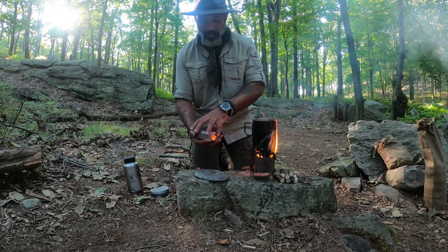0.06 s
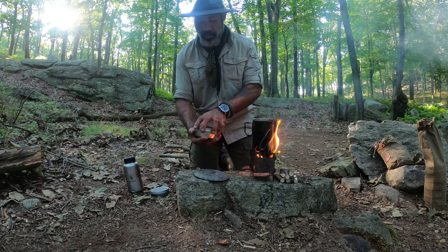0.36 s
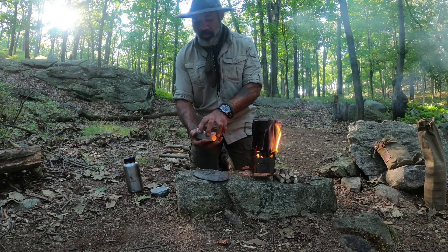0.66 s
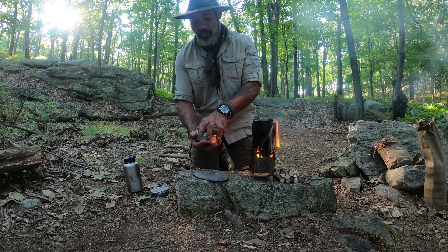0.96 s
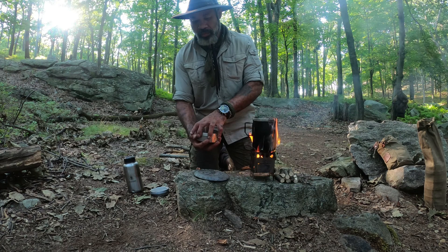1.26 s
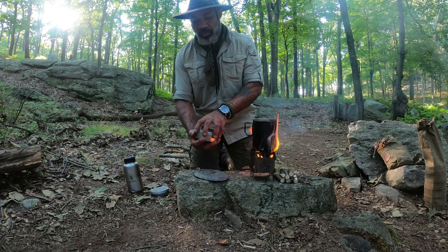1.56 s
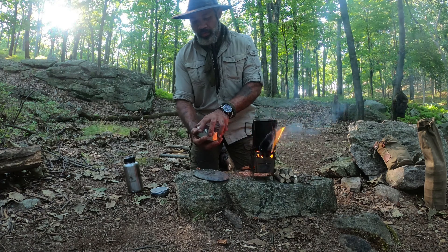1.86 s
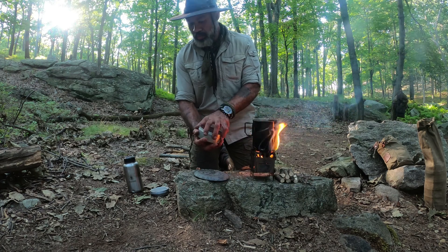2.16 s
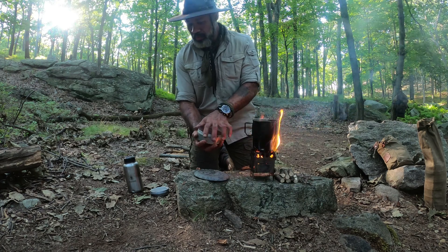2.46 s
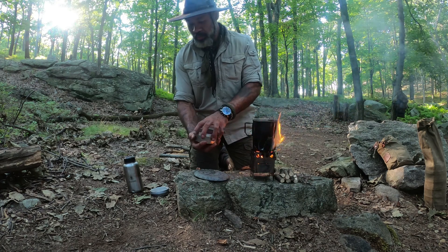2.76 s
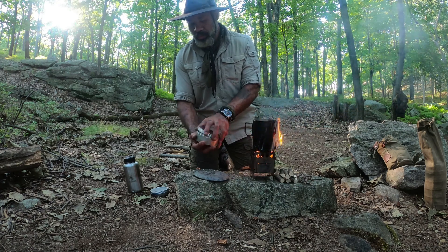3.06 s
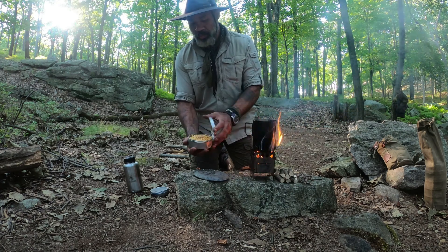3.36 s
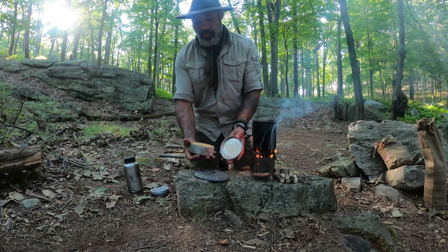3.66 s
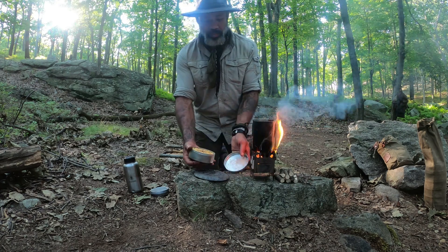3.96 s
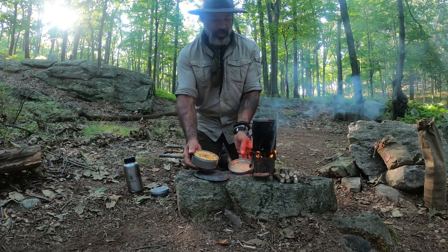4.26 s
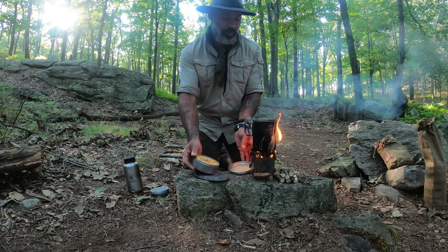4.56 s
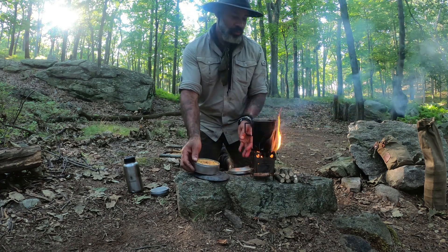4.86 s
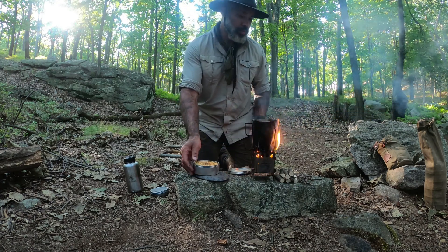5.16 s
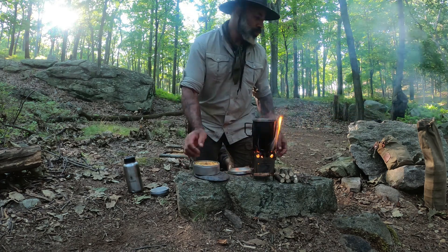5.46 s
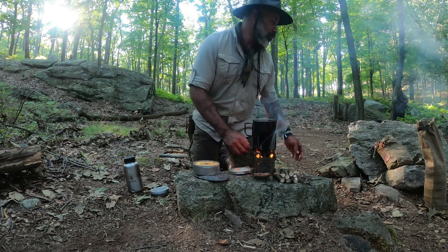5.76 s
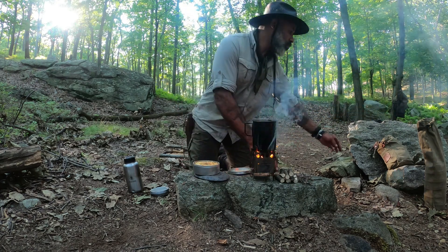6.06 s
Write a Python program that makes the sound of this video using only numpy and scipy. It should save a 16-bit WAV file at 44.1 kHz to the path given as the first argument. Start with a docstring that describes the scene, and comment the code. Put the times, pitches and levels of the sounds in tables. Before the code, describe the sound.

A metal tin is twisted open by hand, its rim scraping and clicking softly until the lid pings free. The thin lid chatters on a stone slab, the full tin lands with a dull knock, and the lid drops, ringing, rattling and rocking to rest. One more knock follows. The handling is close and near the centre, with a low fluttering wood stove, a few snapping sticks and a faint, wide drone of forest insects behind.

```python
"""Opening a tin by the stove

A camper twists the lid off a metal tin, its rim scraping and catching, then sets both on a stone slab.
The thin, empty lid rings as it chatters, drops, rattles and rocks to rest; the full tin only knocks.
Behind them a wood stove flutters low, sticks snap, and insects drone in the trees all around."""
import sys
import numpy as np
from scipy import signal
from scipy.fft import rfft, irfft, next_fast_len
from scipy.io import wavfile
from scipy.ndimage import uniform_filter1d

SR = 44100
rng = np.random.default_rng(int(sys.argv[2]) if len(sys.argv) > 2 else 0)


def pcm_store(signal):
    """Save signal as 16-bit PCM."""
    levels = np.round(np.clip(np.atleast_2d(signal), -1, 1) * 32767)
    wavfile.write(sys.argv[1], SR, levels.astype(np.int16).T)


N = 274743
TIME = np.arange(N) / SR
RING = TIME[:SR // 2]  # time axis of a one-shot


def undb(db):
    """Decibels to gain."""
    return 10 ** (np.asarray(db) / 20)


def unit(x):
    """Scale to rms 1."""
    return x / np.sqrt(np.mean(x ** 2) + 1e-30)


def add(track, s, x):
    """Mix a sound into a track at time s."""
    i = max(int(s * SR), 0)
    track[..., i:i + x.shape[-1]] += x[..., :N - i]


def colour(x, points, tilt_db=0):
    """EQ by (f/Hz, level/dB) points and a tilt per octave, rolled off at both ends; rms 1."""
    hz, db = np.transpose(points)
    f = np.maximum(np.fft.rfftfreq(x.shape[-1], 1 / SR), 1)
    gain = undb(np.interp(np.log(f), np.log(hz), db + tilt_db * np.log2(hz)))
    skirts = np.minimum(f / hz[0], 1) * np.minimum(hz[-1] / f, 1) ** 2
    return unit(irfft(rfft(x) * gain * skirts, x.shape[-1]))


def fade(t60):
    """Free decay of a struck thing."""
    return np.exp(-np.log(1000) * RING / t60)


def burst(eq, t60, tilt_db=0):
    """A hit of coloured noise: instant attack, free decay."""
    return colour(rng.standard_normal(len(RING)), eq, tilt_db) * fade(t60)


def walk(rate):
    """Smooth random modulator: levels held 1 / rate s and slewed twice; rms 1."""
    hold = int(SR / rate)
    steps = np.repeat(rng.standard_normal(N // hold + 1), hold)
    return unit(uniform_filter1d(uniform_filter1d(steps, hold), hold)[:N])


def radiated(x, edge_hz):
    """Low cut: small metal parts push little air below their lowest modes."""
    return signal.sosfilt(signal.butter(4, edge_hz, "high", fs=SR, output="sos"), x)


def strokes(table, eq, grain_db, jerk_db=2):
    """Rubbing: a dense, jerky run of tiny slips that swells quickly and eases off."""
    out = np.zeros(N)
    slips = rng.standard_normal(N) * undb(grain_db * walk(1200) + jerk_db * walk(110))
    for s, length, level_db, tilt_db in table:
        run = np.roll(slips, -int(s * SR))[:len(RING)]
        push = np.sin(np.pi * np.minimum(RING / length, 1) ** 0.49)
        add(out, s, undb(level_db) * push * colour(run, eq, tilt_db))
    return out


def cicada(level_db=-71.5, click_hz=78.5, top_hz=6050, fall_hz=900):
    """A cicada's ribs buckle in a fast rhythm; each chirp falls in pitch, blurred by the foliage."""
    phase = np.cumsum(click_hz * (1 + 0.017 * walk(4))) / SR % 1
    chirps = np.exp(2j * np.pi * np.cumsum(top_hz - fall_hz * phase) / SR) * np.sin(np.pi * phase)
    blur = np.array([walk(300) + 1j * walk(300) for ear in range(2)])
    return undb(level_db) * unit(np.real(chirps * blur))


# EQ of the woodland hush and of the two insect bands: f/Hz, level/dB
HUSH_EQ = [(20, 0), (100, 10.5), (400, 7), (700, -0.5), (1400, 2), (2500, -6), (4000, -2.5), (6700, -13.5),
           (9000, -10.5), (12000, -20), (15000, -19.5)]
LOW_CHORUS_EQ = [(3800, -35.5), (4300, -13.5), (4700, -3.5), (5000, -3.5), (5300, -11.5), (6000, -31.5)]
HIGH_CHORUS_EQ = [(4700, -35), (5350, -6.5), (5950, -4.5), (6400, -20.5), (7000, -16), (7500, -11),
                  (7700, -5.5), (7900, -12.5), (8200, -15), (8800, -33.5)]
def forest(hush_db=-69.5, low_db=-67, high_db=-68.5, swell_db=1.94, flicker_db=1.14):
    """A wide bed: hush, one cicada and two insect choruses, the lower swelling and flickering."""
    low = colour(rng.standard_normal((2, N)), LOW_CHORUS_EQ)
    low *= undb(low_db + swell_db * walk(2) + flicker_db * walk(28))
    high = undb(high_db) * colour(rng.standard_normal((2, N)), HIGH_CHORUS_EQ)
    return low + high + cicada() + undb(hush_db) * colour(rng.standard_normal((2, N)), HUSH_EQ)


# fader ride of the flames building and dying down: t/s, level/dB
BLAZE = [(0, -57.5), (1.7, -51.5), (2.2, -48), (3.5, -46.5), (4.3, -53.5), (5.4, -61), (6.23, -54)]
# EQ of the flames' roar and of the draught's rumble: f/Hz, level/dB
FLAME_EQ = [(50, -16), (100, -3), (140, 2.5), (170, 3), (230, -6), (310, -18), (420, -28), (600, -49),
            (1200, -50.5)]
DRAUGHT_EQ = [(20, -28.5), (40, -9.5), (68, 5.5), (110, 4), (200, -21)]
def stove(flutter_db=2, flame_side_db=-17, draught_db=-58, draught_side_db=-11, surge_db=2, follow=0.37):
    """The stove draws with a surging rumble and its flames flutter above it, both nearly mono."""
    apart = np.array([[1], [-1]])
    blaze_db = np.interp(TIME, *np.transpose(BLAZE))
    mid, side = colour(rng.standard_normal((2, N)), FLAME_EQ)
    roar = (mid + undb(flame_side_db) * apart * side) * undb(blaze_db + flutter_db * walk(18))
    mid, side = colour(rng.standard_normal((2, N)), DRAUGHT_EQ)
    rumble_db = draught_db + follow * (blaze_db - blaze_db.mean()) + surge_db * walk(7.3)
    return roar + undb(rumble_db) * (mid + undb(draught_side_db) * apart * side)


# EQ of the rustles and dry clicks: f/Hz, level/dB
CRISP_EQ = [(200, -4.5), (700, -7), (1400, 2.5), (3300, 2), (6000, -8), (9000, -16.5), (15000, -37.5)]
# the camper's movements: t/s, length/s, level/dB, tilt/(dB/octave)
RUSTLES = [(5.97, 0.12, -58.5, 3.5), (6.1, 0.07, -55, 4)]
def rustles():
    """Dry leaves and cloth rub as the camper shifts."""
    return strokes(RUSTLES, CRISP_EQ, grain_db=2)


# short dry clicks: t/s, level/dB, tilt/(dB/octave)
DRY_CLICKS = [(.525, -52.5, 5.5), (.689, -42.5, 8), (1.01, -56, 6.5), (1.268, -52, 6), (3.565, -54.5, 7),
              (4.3198, -42.5, 3.5), (5.116, -42.5, 3), (6.137, -45.5, 1)]
def dry_clicks(t60=0.02):
    """Short dry clicks: sticks snapping, and at 5.116 s the lid's last tick on the stone."""
    out = np.zeros(N)
    for s, level_db, tilt_db in DRY_CLICKS:
        add(out, s, undb(level_db) * burst(CRISP_EQ, t60, tilt_db))
    return out


# EQ of the closed tin rubbed in the hands: f/Hz, level/dB
RUB_EQ = [(200, 1.5), (500, -4.5), (850, -13.5), (1200, 0.5), (1400, 2.5), (1730, -1), (2050, -11.5),
          (2480, -0.5), (3300, -4), (4200, -5.5), (6000, -10.5), (9000, -15), (11500, -25.5), (15000, -34)]
# turns of the lid: t/s, length/s, push level/dB
TWISTS = [(0.199, 0.27, -56.5), (1.397, 0.087, -50.5), (1.58, 0.23, -64.5), (1.8, 0.16, -66),
          (1.96, 0.22, -61), (2.14, 0.34, -67), (2.807, .3, -55.5), (3.117, 0.061, -49)]
# clicks of the thread catching: t/s, level/dB
CATCHES = [(.1, -42), (.69, -53), (0.833, -60), (1.135, -65), (1.266, -62.5), (1.467, -49.5), (2.529, -65),
           (2.659, -51), (3.027, -55.5)]
# pings as the lid loosens and comes free: t/s, f/Hz, level/dB, t60/s
PINGS = [(.162, 2460, -51, .06), (3.135, 3020, -45, .11), (3.122, 4230, -53, .15)]
def twisting(rub_db=1, ring_db=-4, held_damping=5, neutral_push_db=-57.5, brighten=0.33):
    """The rim scrapes and catches round the tin and wakes the hand-damped lid, which pings free."""
    # a firmer push is brighter
    pushes = [(s, length, db, brighten * (db - neutral_push_db)) for s, length, db in TWISTS]
    rub = strokes(pushes, RUB_EQ, grain_db=2, jerk_db=2.15)
    for s, db in CATCHES:
        add(rub, s, undb(db) * burst(RUB_EQ, t60=0.12, tilt_db=-3))
    held_lid = sum(undb(db / 2) * np.sin(2 * np.pi * hz * RING) * fade(t60 / held_damping)
                   for hz, db, t60 in LID_MODES)
    ring = np.std(rub) * unit(signal.fftconvolve(rub, held_lid)[:N])
    out = undb(rub_db) * rub + undb(ring_db) * ring
    for s, hz, db, t60 in PINGS:
        add(out, s, undb(db) * np.sin(2 * np.pi * hz * RING) * fade(t60))
    return out


# modes of the full tin, choked by its contents and the hand: f/Hz, level/dB, t60/s
TIN_MODES = [(1210, -5, 0.021), (1472, -0.5, 0.019), (1695, -10, 0.02), (2125, 2.5, 0.015),
             (2900, -11, 0.019), (3220, -10.5, 0.023), (4300, -27, 0.018)]
# hollow tones of the tin cupped in the hands: f/Hz, level/dB
HOLLOW = [(205, 5.5), (290, 2), (410, -2.5)]
# knocks in the hands, then on the slab: t/s, level/dB, relative thump/dB
TIN_KNOCKS = [(.0945, -31.5, -4), (.110, -41, -1), (.161, -55, 2.5), (4.5098, -23, -29.5),
              (4.5112, -14.5, -40), (5.1631, -23, -38)]
def tin(scuff_s=4.488, scuff_length_s=0.091, scuff_db=-53.5, scuff_tilt_db=-1.5,
        contact_s=0.0043, thump_t60=0.032, grit_db=-17):
    """Dead, gritty knocks: the tin thumps hollowly in the hands and scuffs the stone as it lands."""
    out = strokes([(scuff_s, scuff_length_s, scuff_db, scuff_tilt_db)], RUB_EQ, grain_db=5)
    body = sum(undb(db) * np.sin(2 * np.pi * hz * RING) * fade(t60) for hz, db, t60 in TIN_MODES)
    body *= (1 - fade(contact_s)) ** 2
    thump = sum(undb(db) * np.sin(2 * np.pi * hz * RING) for hz, db in HOLLOW) * fade(thump_t60)
    for s, level_db, thump_db in TIN_KNOCKS:
        knock = radiated(body + undb(grit_db) * burst(RUB_EQ, t60=0.012), edge_hz=950)
        add(out, s, undb(level_db) * (knock - undb(thump_db) * thump))
    return out


def bounces(s, gap_s, shrink, count=3):
    """Numbered times of a run of contacts, each gap a fixed share of the one before."""
    return enumerate(s + gap_s * (1 - shrink ** np.arange(count)) / (1 - shrink))


def contact(s, level_db, tilt_db, face_db, damping):
    """One hit of lid on stone: tilt_db per octave brightens, face_db drums the face, damping chokes."""
    return s, level_db, tilt_db, face_db, damping


# the lid's hits on the stone, the last being the drop:
# t/s, level/dB, tilt/(dB/octave), damping factor, first rebound gap/s, loss per rebound/dB
LID_HITS = [(4.0951, -28, -1, 1.96, .0424, 3.5), (4.572, -43, -5.5, 0.95, .021, 3),
            (4.683, -28, -1, 1.0, .081, 10.5), (4.7844, -17.5, 4.5, 1.8, 0.045, 7)]
def chatter(first_face_db=-9, face_db_per_s=24.5, dulling_db=1):
    """Each hit rebounds softer and duller; the face drums more as the lid is lowered from its rim."""
    for s, level_db, tilt_db, damping, gap_s, loss_db in LID_HITS:
        face_db = first_face_db + face_db_per_s * (s - LID_HITS[0][0])
        for k, at in bounces(s, gap_s, shrink=.93):
            yield contact(at, level_db - k * loss_db, tilt_db - k * dulling_db, face_db, damping)


def rattle(drop_s, gap_s=.0105, jitter=.12, level_db=-24.5, fall_db_per_s=108.5):
    """Let go, the lid rattles on its rim in a fast, slightly uneven, fading roll."""
    for k, chance in enumerate(rng.standard_normal(8)):
        after = gap_s * (k + 1 + jitter * chance)
        yield contact(drop_s + after, level_db - fall_db_per_s * after,
                      tilt_db=1, face_db=1.5, damping=0.99)


def rocking(drop_s, gap_s=.1721, shrink=.582, rim_lag_s=.015):
    """The lid rocks to rest ever faster: the face slaps down and the rim ticks just after."""
    for k, at in bounces(drop_s + gap_s, gap_s * shrink, shrink):
        yield contact(at, level_db=-31.5 - 7.5 * k, tilt_db=3.5, face_db=17, damping=4.2)
        yield contact(at + rim_lag_s, level_db=-35.5 - 9 * k, tilt_db=3.5, face_db=14, damping=1.5)


# EQ of the lid's wash of weak, close overtones: f/Hz, level/dB
WASH_EQ = [(300, -20), (420, -16.5), (600, -41), (830, -30.5), (1100, -12), (1600, -2.5), (2200, 1.5),
           (2750, -4), (3600, 3), (3950, -15.5), (4400, 2), (6300, -17), (10000, -22), (11500, -30),
           (15000, -42)]
def overtones(level_db=-9, t60=.22, spread_db=5, count=70):
    """Shimmer from the thin sheet's many weak modes, as rows of f/Hz, level/dB, t60/s."""
    hz = rng.uniform(1500, 14500, count)
    db = np.interp(hz, *np.transpose(WASH_EQ)) + spread_db * rng.standard_normal(count)
    gain = unit(undb(db)) * np.sqrt(2 / count)
    return np.transpose([hz, level_db + 20 * np.log10(gain), np.full(count, t60)])


# modes of the lid ringing freely: f/Hz, level/dB, t60/s
LID_MODES = [(412, -19, .16), (1161, -6, .26), (1388, -7, .3), (1790, -17, .15), (2095, -5, .22),
             (2125, 3, .04), (2148, -7, .18), (2218, -5, .22), (2340, -11, .38), (2459, -2, .36),
             (2496, -8.5, .28), (2544, -5, .25), (2893, -14, .38), (2931, -13, .38), (3215, -10, .2),
             (3580, -12, .2), (3646, -5, .2), (3733, -7, .42), (4210, -11, .3), (4290, -13, .15),
             (4542, -10.5, .45), (4885, -13, .18), (4926, -12, .18), (5770, -15.5, .33), (6481, -23, .35),
             (6783, -25, .25), (7905, -21, .3), (8635, -26, .2), (9150, -17, .14), (10400, -21, .08)]
def lid(ring_db=-4.5, wash_db=-10, wash_t60=.2, tick_db=-1, tick_t60=0.01, rim_tick_share=0.0992,
        face_hz=2135, face_width_hz=120, hoop_share=.7,
        grind_s=0.28, grind_db=-42.5, grind_tilt_db=5, rest_s=5.115, rest_t60=.14):
    """Every hit rings the same modes: a flat one drums the face, a rim hit ticks and flexes the hoop."""
    hz, db, t60 = np.vstack([LID_MODES, overtones()]).T
    modes = np.exp(2j * np.pi * hz[:, None] * RING) * fade(t60[:, None])
    face = np.exp(-((hz - face_hz) / face_width_hz) ** 2) - hoop_share * (hz == hz.min())
    attack = (1 - fade(0.0063)) ** 2  # bending waves need a moment to spread over the sheet
    drop_s = LID_HITS[-1][0]
    # the dropped lid grinds over the grit
    out = strokes([(drop_s, grind_s, grind_db, grind_tilt_db)], WASH_EQ, grain_db=3)
    for s, level_db, tilt_db, face_db, damping in [*chatter(), *rattle(drop_s), *rocking(drop_s)]:
        gain = undb(db + tilt_db * np.log2(hz / face_hz) + face_db * face)
        phase = np.exp(2j * np.pi * rng.random(len(hz)))  # set by the point of contact
        choke = fade(0.41) ** (damping - 1)  # fingers and stone damp the ring
        ring = undb(ring_db) * np.imag((gain * phase) @ modes) * attack * choke
        # grit under the rim adds a tick and a noisy wash
        grit = colour(rng.standard_normal(len(RING)), WASH_EQ, tilt_db) * (1 - fade(0.0011))
        tick = undb(tick_db - rim_tick_share * face_db) * fade(tick_t60)
        wash = undb(wash_db) * fade(wash_t60 / damping)
        add(out, s, undb(level_db) * (ring + grit * (wash + tick)))
    mute = undb(-60 * np.maximum(TIME - rest_s, 0) / rest_t60)  # the stone stills the lid lying flat
    return radiated(out, edge_hz=330) * mute


def place(x, lag, pan_db, most_rad=6.8):
    """Close-pair stereo: the left is lag samples late, its phase gap held under most_rad in the treble."""
    size = next_fast_len(N + SR // 10)
    gap = most_rad * np.tanh(2 * np.pi * np.fft.rfftfreq(size) * lag / most_rad)
    late = irfft(rfft(x, size) * np.exp(-1j * gap), size)[:N]
    return np.array([late * undb(pan_db / 2), x * undb(-pan_db / 2)])


def echoes(x, wet_db, t60, tilt_db):
    """A tail of scattered reflections, different in each ear."""
    scatter = colour(rng.standard_normal((2, len(RING))), [(300, 0), (15000, 0)], tilt_db)
    tail = unit(scatter * fade(t60) * (1 - fade(t60 / 10))) / np.sqrt(len(RING))
    return undb(wet_db) * signal.fftconvolve(x[None], tail, axes=1)[:, :N]


def scene():
    """Lid and tin sit just right of centre; the slab reflects at once, the trees faintly and later."""
    clatter = lid()
    handling = tin() + twisting() + dry_clicks() + rustles()
    near = place(clatter, lag=1.7, pan_db=-1.5, most_rad=2.6) + place(handling, lag=1.3, pan_db=-0.2)
    slab = echoes(clatter + handling, wet_db=-14.5, t60=0.0054, tilt_db=0.5)
    trees = echoes(clatter + handling, wet_db=-25.5, t60=.7, tilt_db=-1)
    return near + slab + trees + stove() + forest()


def record(dry, top_hz=15550):
    """A steep high cut on the whole mix."""
    return signal.sosfilt(signal.ellip(8, .2, 70, top_hz, fs=SR, output="sos"), dry)


dry = scene()
out = record(dry)
pcm_store(out)
```